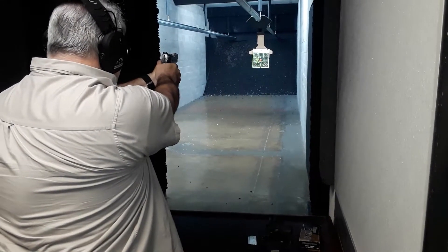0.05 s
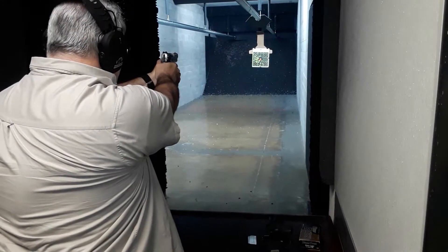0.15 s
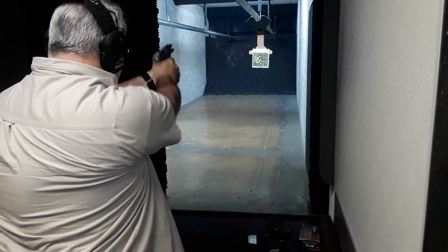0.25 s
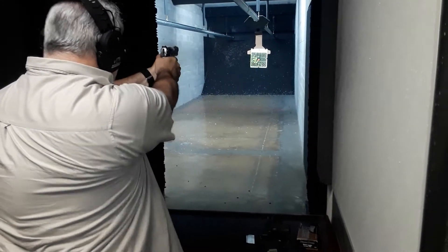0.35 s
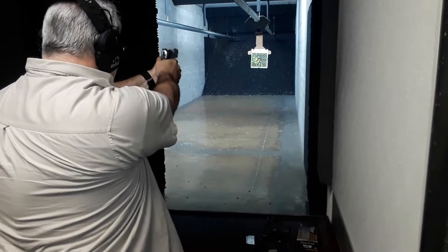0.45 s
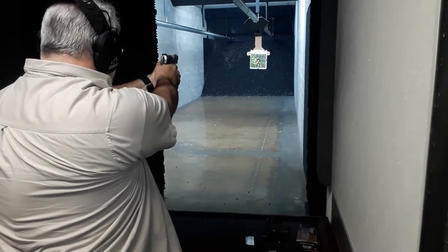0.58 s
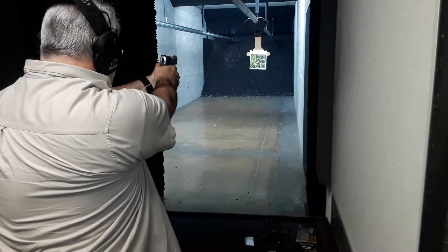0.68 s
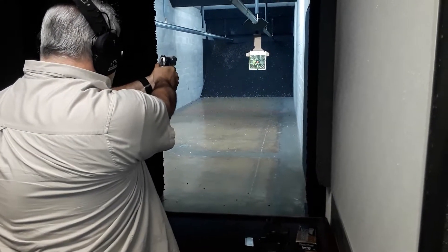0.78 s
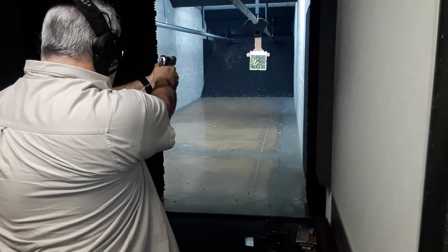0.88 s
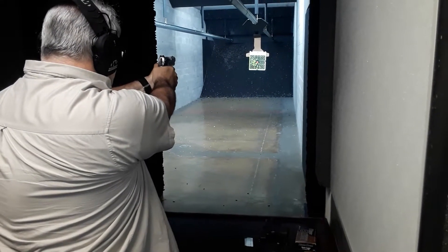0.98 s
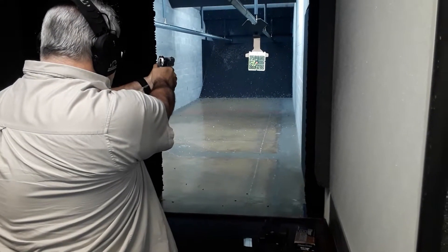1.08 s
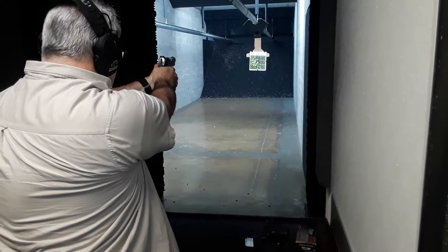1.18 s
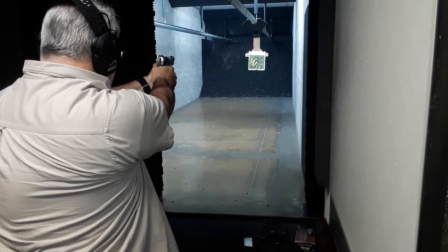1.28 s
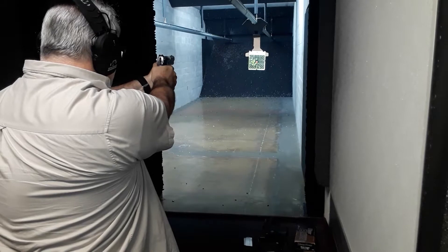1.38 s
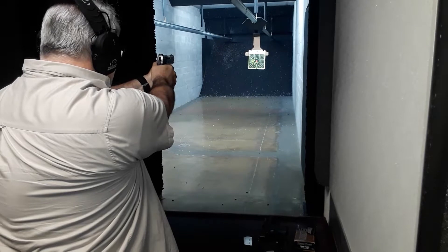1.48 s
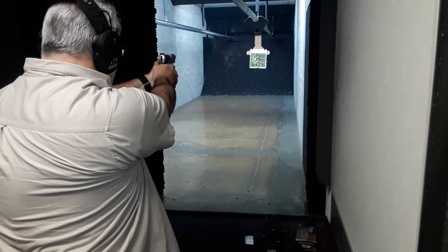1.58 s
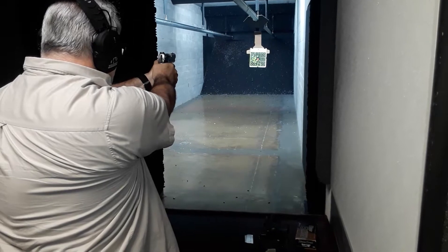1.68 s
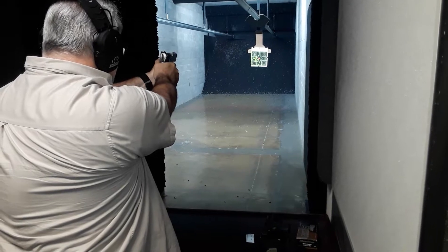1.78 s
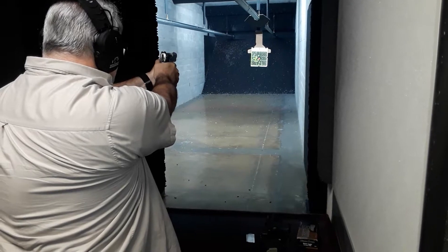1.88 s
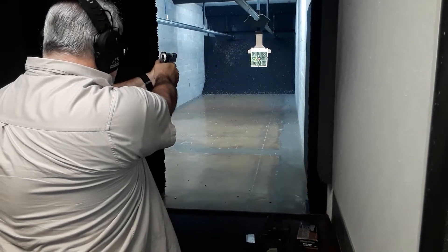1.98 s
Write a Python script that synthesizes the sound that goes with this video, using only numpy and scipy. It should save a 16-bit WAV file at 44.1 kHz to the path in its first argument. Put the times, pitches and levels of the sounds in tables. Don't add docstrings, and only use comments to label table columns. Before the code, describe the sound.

A single pistol shot cracks in a concrete indoor range, its roar echoing over rushing ventilation

```python
import sys
import numpy as np
from scipy import signal
from scipy.fft import rfft, irfft
from scipy.io import wavfile
from scipy.ndimage import uniform_filter1d, minimum_filter1d

SR = 44100
rng = np.random.default_rng(int(sys.argv[2]) if len(sys.argv) > 2 else 0)


def unload_audio(sound):
    columns = np.transpose(np.atleast_2d(sound))
    steps = np.round(np.clip(columns, -1, 1) * 32767)
    wavfile.write(sys.argv[1], SR, steps.astype(np.int16))


def boost(x):
    u = np.asarray(x, float) / 20
    return 10 ** u


N = 88200

SHOT_S = 0.2477
FIRST_RETURN_S = 0.036


def read(table, hz):
    table = np.array(table, float)
    return np.interp(np.log(hz), np.log(table[:, 0]), table[:, 1])


def humps(table, f):
    return sum(level_db / (1 + (2 * (f - hz) / width_hz) ** 2) for hz, width_hz, level_db in table)


def walk(rate):
    points = rng.standard_normal(300)
    return 1.2 * np.interp(np.arange(N) * rate / SR, np.arange(300), points)


def fade(t, t60):
    return (t >= 0) * boost(-60 * np.maximum(t, 0) / t60)


# pitch_hz, likeness (0-1)
LIKENESS = [(60, 1), (290, 0.93), (640, .68), (1410, 0.47), (3100, 0), (7000, .01)]


def bands(colour_db):
    f = np.maximum(np.arange(N // 2 + 1) * SR / N, 1.0)
    alike = np.clip(read(LIKENESS, f), 0, 1)
    mid, side = rfft(rng.standard_normal((2, N))) * boost(colour_db(f))
    both = mid * np.sqrt((1 + alike) / 2) + side * np.sqrt((1 - alike) / 2) * np.array([[1], [-1]])
    both[1] *= np.exp(-2j * np.pi * f * 3 / SR)
    for hz in 25 * 2 ** (np.arange(20) / 2):
        window = np.cos(np.pi / 4 * np.clip(4 * np.log2(f / hz), -2, 2)) ** 2
        yield hz, irfft(both * window, N)


# pitch_hz, level_db (per Hz)
AIR = [(30, -33.5), (100, -6), (230, -2), (480, -16.5), (1900, -15), (3500, -33), (8500, -50.5),
       (9800, -57), (16000, -67)]
# pitch_hz, width_hz, level_db
DUCTS = [(179, 40.4, 3), (243, 14.4, 1.5), (335, 25, 8), (1620, 880, 0), (5200, 300, 2.5)]


def ventilation():
    def colour_db(f):
        return read(AIR, f) + humps(DUCTS, f)

    flicker_db, flicker_rate = 1.26, 7.4
    rush = sum(noise * boost(flicker_db * walk(flicker_rate)) for hz, noise in bands(colour_db))
    return rush / rush.std() * boost(-27)


def blast(t):
    push_s, pull_s = 0.00015, 0.00095
    u = t - SHOT_S
    push = np.sin(np.pi * np.clip(u / push_s, 0, 1)) / 2
    pull = np.sin(np.pi * np.clip((u - push_s) / pull_s, 0, 1) ** 0.6)
    return boost(-1) * (push - pull)


PATCHY_DB, PATCHY_RATE = 1.5, 40.15

# pitch_hz, level_db (per Hz)
SPRAY = [(35, -57), (100, -4), (900, -6), (2200, -3.5), (4000, -11), (7000, -19), (11000, -25),
         (16000, -19)]


def spray(t, patchy):
    start_s, hold_s, t60_s = 0.00065, 0.041, 0.13
    trap_s, trap_t60_s = 0.1, 0.12
    u = t - SHOT_S
    noise = sum(band for hz, band in bands(lambda f: read(SPRAY, f))) * boost(PATCHY_DB * patchy)
    noise = noise / noise.std()
    near = boost(-7.5) * (u > start_s) * fade(np.maximum(u - hold_s, 0), t60_s)
    far = boost(-17) * fade(u - trap_s, trap_t60_s)
    return noise * (near + far)


# pitch_hz, level_db (per Hz)
ROAR = [(25, -58.5), (60, -16), (120, -3), (200, -2), (300, -8), (800, -4.5), (2500, -16.5), (6000, -29),
        (14000, -33)]
# pitch_hz, t60_s
ROAR_T60 = [(60, 1), (200, 0.89), (600, 0.66), (2000, 0.62), (6000, 0.62), (15000, 0.44)]
# pitch_hz, width_hz, level_db
LANE_MODES = [(132.8, 7.7, 4), (203, 8.5, 4), (240, 14, 6), (320.4, 14, 1.5), (473, 15, 4), (726, 17, 6),
              (950.5, 24.3, 5.5)]
# start_s (after the shot), level_db (over the roar), length_s, dull_above_hz
SLAPS = [
    (0.023, 8, 0.031, 900),
    (0.096, 11, 0.0049, 13100),
    (0.177, 2, 0.013, 1174),
    (.25, 1.5, 0.025, 5000),
    (.37, 4.5, .012, 700),
]


def roar(t, patchy):
    rise_s, hold_s = 0.006, 0.12
    linger_db, linger_t60_s, linger_hz = -18, 1.7, 900
    u = t - SHOT_S
    v = u - FIRST_RETURN_S
    slaps = []
    for start_s, level_db, length_s, dull_hz in SLAPS:
        rise = np.clip((u - start_s) / 0.003 + 1, 0, 1)
        slaps.append((level_db * rise * np.exp(-np.maximum(u - start_s, 0) / length_s), dull_hz))

    out, steady = 0, 0
    for hz, noise in bands(lambda f: read(ROAR, f) + humps(LANE_MODES, f)):
        slap_db = sum(level_db / (1 + (hz / dull_hz) ** 2) for level_db, dull_hz in slaps)
        band_hold_s = hold_s * min(2500 / hz, 1)
        decay = fade(np.maximum(v - band_hold_s, 0), read(ROAR_T60, hz))
        linger = boost(linger_db) * fade(v, linger_t60_s) / (1 + (hz / linger_hz) ** 2)
        out = out + noise * boost(slap_db + PATCHY_DB * walk(PATCHY_RATE)) * (decay + linger)
        steady = steady + noise
    return out / steady.std() * boost(-8 + 0.6 * patchy) * np.clip(v / rise_s, 0, 1)


def lane(t):
    patchy = walk(PATCHY_RATE)
    return spray(t, patchy) + roar(t, patchy)


# pitch_hz, level_db, t60_s
BOOTH = [(231.5, -12.5, 0.25), (330, -9, 0.35), (609, -34, 1.9), (729, -27.5, 1.5), (1220, -34, 2.2)]


def booth(t):
    u = t - SHOT_S - FIRST_RETURN_S
    phases = rng.uniform(-0.5, 0.5, (len(BOOTH), 2, 1))
    ring = 0
    for (hz, level_db, t60_s), phase in zip(BOOTH, phases):
        ring = ring + boost(level_db) * np.sin(2 * np.pi * hz * u + phase) * fade(u, t60_s)
    return ring * np.clip(u / 0.016, 0, 1)


# start_s, tick_db, ring_db, overtone_db, ring_rise_s
CASE = [
    (.683, -29, -56, -67, .022),
    (.872, -70, -52, -80, .045),
]


def case(t):
    tick_hz, tick_t60_s = 4300, 0.015
    ring_hz, overtone_hz, ring_t60_s = 7275, 11650, 0.55
    spin_hz, spin_depth, airborne_s = 25, 0.3, 0.1
    out = 0
    for start_s, tick_db, ring_db, overtone_db, rise_s in CASE:
        u = t - start_s
        tick = np.sin(2 * np.pi * tick_hz * u) * fade(u, tick_t60_s)
        tick = tick + 0.47 * rng.standard_normal((2, N)) * fade(u, 0.008)
        ring = boost(ring_db) * np.sin(2 * np.pi * ring_hz * u)
        ring = ring + boost(overtone_db) * np.sin(2 * np.pi * overtone_hz * u)
        spin = 1 - spin_depth * np.cos(2 * np.pi * spin_hz * u)
        swell = np.clip(u / rise_s, 0, 1) ** 1.5 * fade(u, ring_t60_s)
        touch_down = np.clip((airborne_s - u) / 0.015 + 1, 0, 1)
        out = out + boost(tick_db) * tick + ring * spin * swell * touch_down
    return out


DUCK_DB = -14


def scene():
    t = np.arange(N) / SR
    air = ventilation()
    shot = (blast(t) + lane(t) + booth(t)) * boost(-DUCK_DB)
    left_db = -1
    return (shot + case(t) + air) * boost(np.array([[left_db], [-left_db]]) / 2)


def low_pass(x):
    return signal.sosfilt(signal.butter(12, 16660, fs=SR, output="sos"), x)


def record(dry):
    duck_lead_s, hold_to_s, back_at_s, back_bend = 0.0061, 1.45, 1.747, 1.63
    limit_db, look_s, clip_db = 3.5, 0.003, 2.2
    t = np.arange(N) / SR
    x = signal.sosfilt(signal.butter(2, 72, 'high', fs=SR, output='sos'), dry)

    down = np.clip((t - SHOT_S) / duck_lead_s + 1, 0, 1)
    back = np.clip((t - hold_to_s) / (back_at_s - hold_to_s), 0, 1) ** back_bend
    x = x * boost(DUCK_DB * down * (1 - back))

    look = int(look_s * SR)
    limit_gain = np.minimum(boost(limit_db) / (np.abs(x).max(axis=0) + 1e-9), 1)
    x = x * uniform_filter1d(minimum_filter1d(limit_gain, 2 * look), look)

    x = x / boost(clip_db)
    x = x / (1 + np.abs(x) ** 4) ** 0.25 * boost(clip_db)
    x = signal.sosfiltfilt(signal.ellip(8, 0.1, 40, 15650, fs=SR, output='sos'), x)
    return low_pass(x)


dry = scene()
out = record(dry)
unload_audio(out)
```